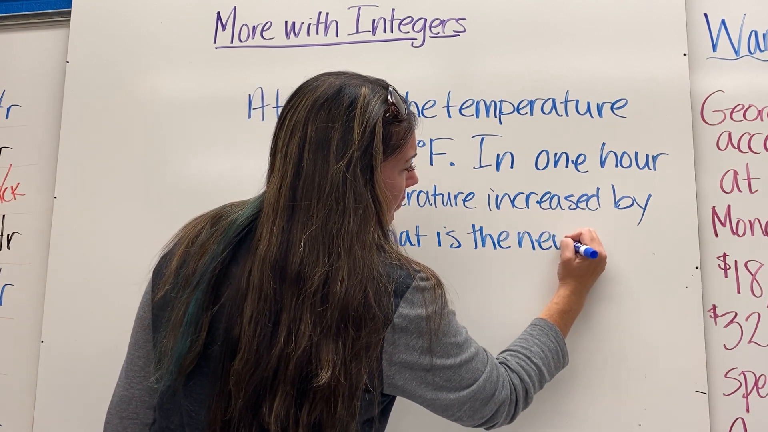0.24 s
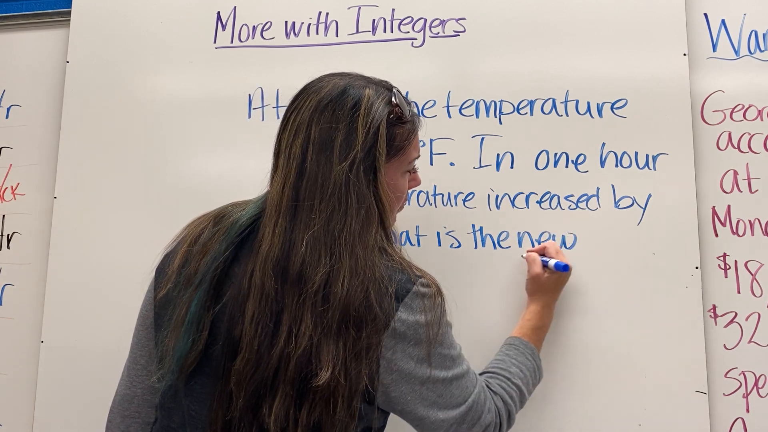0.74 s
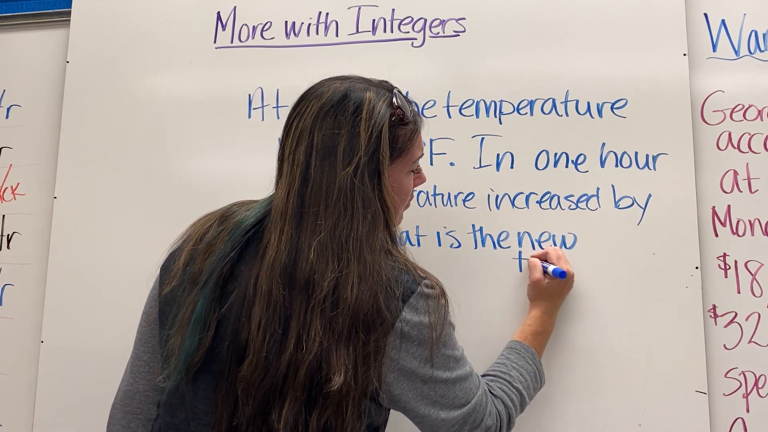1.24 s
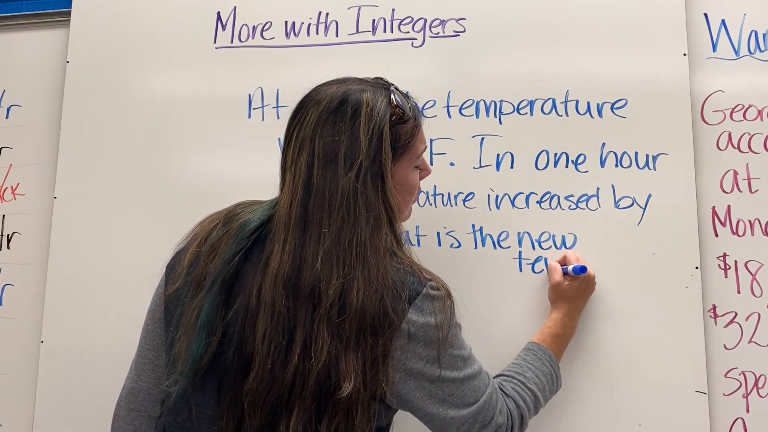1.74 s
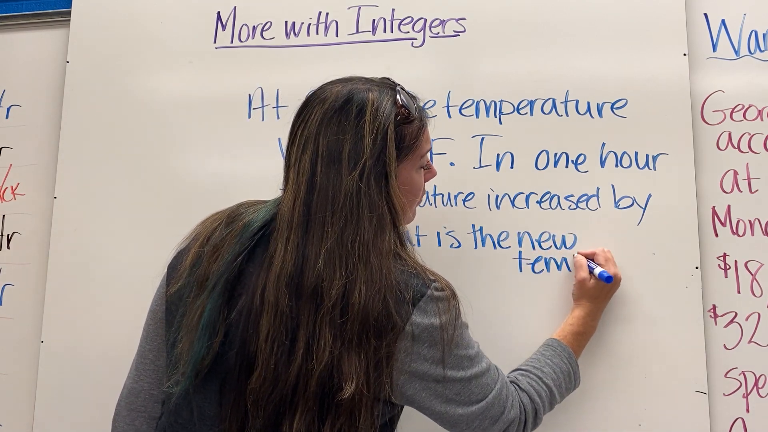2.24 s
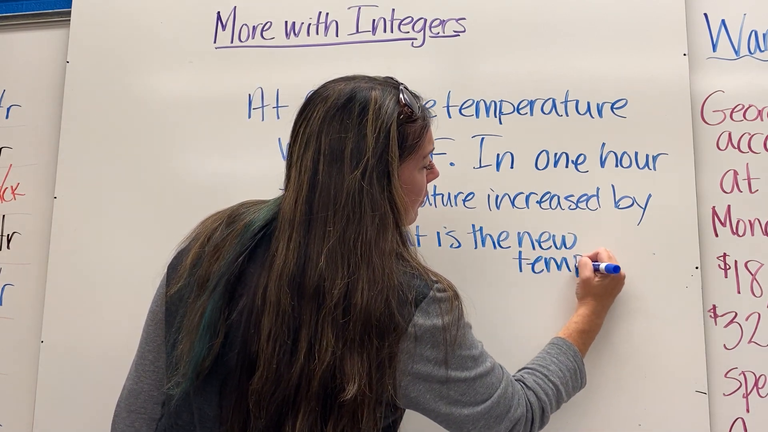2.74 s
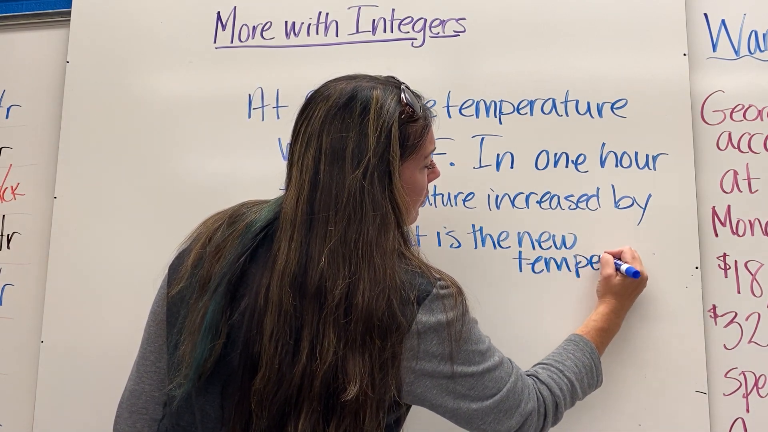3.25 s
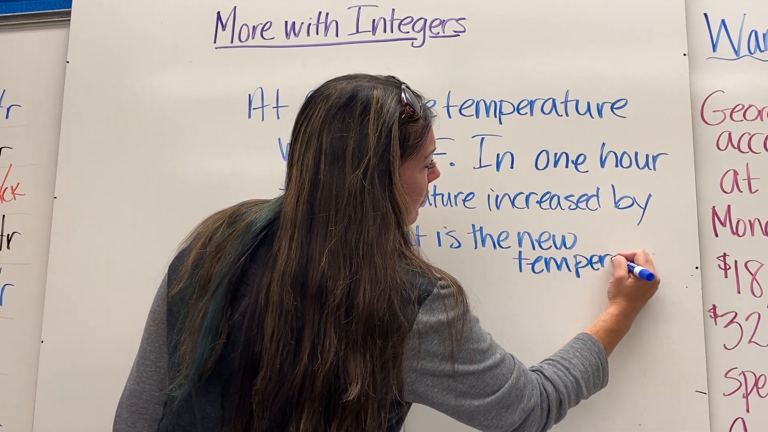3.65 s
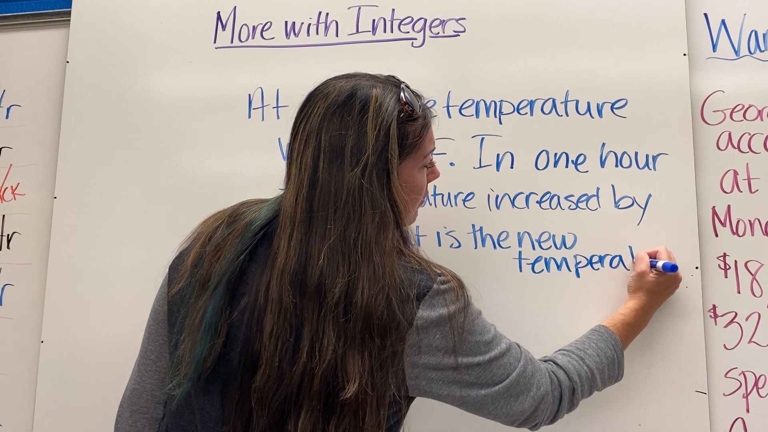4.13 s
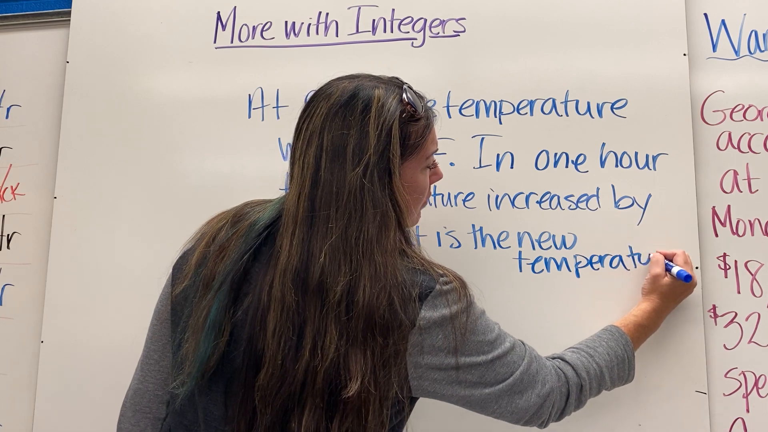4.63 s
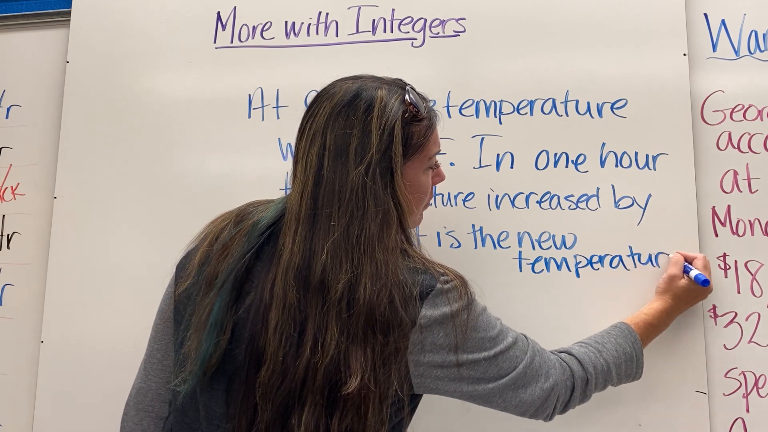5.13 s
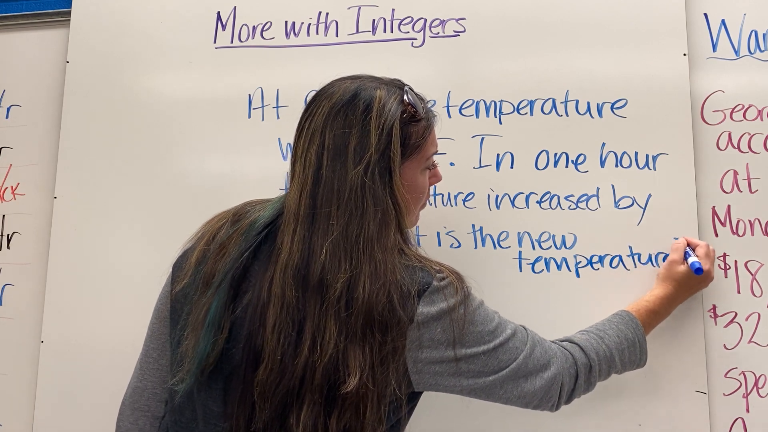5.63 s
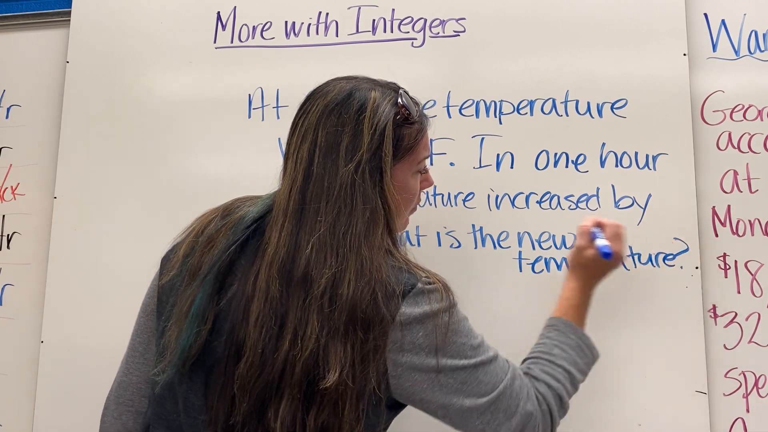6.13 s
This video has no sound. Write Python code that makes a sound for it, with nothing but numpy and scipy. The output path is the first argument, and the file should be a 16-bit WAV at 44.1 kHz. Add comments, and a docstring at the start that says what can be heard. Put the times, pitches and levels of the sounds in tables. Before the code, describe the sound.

Quick, light dry-erase marker strokes scratch and tap on a hollow board in a quiet room with rumbling ventilation and a faint ticking clock.

```python
"""A felt marker writes on a wall-mounted whiteboard in a quiet classroom.
Each stroke is filtered noise: felt hiss, a squeak, a sizzle and the ringing barrel.
Some landings of the nib make the board thud: short pushes set decaying sine waves ringing.
Behind it, ventilation hums and rumbles, noise and clicks swell into a soft rustle,
and something, likely a wall clock, ticks faintly once a second with tiny bursts of noise."""
import sys
import numpy as np
from scipy import signal
from scipy.fft import rfft, irfft
from scipy.io import wavfile

SR = 44100
rng = np.random.default_rng(int(sys.argv[2]) if len(sys.argv) > 2 else 0)


def master_out(mix):
    """Clip the mix to full scale and print it as 16-bit PCM to the path in sys.argv[1]."""
    frames = np.transpose(np.atleast_2d(mix))
    ceiling = np.clip(frames, -1, 1)
    pcm = np.round(ceiling * 32767).astype(np.int16)
    wavfile.write(sys.argv[1], SR, pcm)


N = 281358
TIME = np.arange(N) / SR  # s
BINS_HZ = np.maximum(np.arange(N // 2 + 1) * SR / N, 1)
CLASSROOM_T60_S = 0.3  # time for the room's tail to die by 60 dB


def from_db(db):
    """Turn decibels into gain."""
    return 10 ** (np.asarray(db) / 20)


def rms_one(x):
    """Scale to an rms of 1."""
    return x / np.sqrt(np.mean(x ** 2) + 1e-20)


def filtered(x, hz, kind, order=2):
    """Low-, high- or band-pass that never looks ahead in time."""
    edges = np.clip(hz, 10, .45 * SR)
    sections = signal.butter(order, edges, kind, fs=SR, output="sos")
    return signal.sosfilt(sections, x + 1e-18)


def over_hz(table):
    """Read the columns of a table at every frequency, joined on a log axis."""
    hz, *columns = np.transpose(table)
    return [np.interp(np.log(BINS_HZ), np.log(hz), column) for column in columns]


def coloured(x, spectrum):
    """Make some frequencies of a signal louder and others softer."""
    gain = from_db(over_hz(spectrum)[0])
    return irfft(rfft(x) * gain, N)


def white():
    """Fresh white noise, equally strong at all frequencies."""
    return rng.standard_normal(N)


def narrow_noise(hz, width_hz):
    """Noise in one steep-sided resonance, rms 1; centred on zero it is a slow drift."""
    gain = 1 / (1 + ((BINS_HZ - hz) / width_hz) ** 2)
    return rms_one(irfft(rfft(white()) * gain, N))


def classroom(x, alike_hz=500):
    """A diffuse, dying room tail of unit energy per side; long waves reach both sides alike."""
    t = TIME[:SR]
    shared = filtered(rng.standard_normal(SR), alike_hz, "low", order=4)
    separate = filtered(rng.standard_normal((2, SR)), alike_hz, "high", order=4)
    decay = from_db(-60 * t / CLASSROOM_T60_S)
    tails = (shared + separate) * decay * (t > .005)  # the tail starts after 5 ms
    return signal.fftconvolve(x[None], tails / np.linalg.norm(tails[0]), axes=1)[:, :N]


def friction(grain_db=1.0, pressure_db=1.5):
    """Noise of wavering level, rms 1, like fibres that catch and slip under unsteady pressure."""
    grain = grain_db * narrow_noise(0, width_hz=500)
    pressure = pressure_db * narrow_noise(0, width_hz=21)
    return rms_one(white() * from_db(grain + pressure))


def snags(per_s=130, size_db=0.5):
    """Sparse clicks of uneven size, rms 1, like fibres that stick and snap free."""
    sizes = from_db(size_db * np.minimum(rng.exponential(1, N), 3))
    sizes = sizes * rng.choice([-1, 1], N)
    return rms_one(sizes * (rng.random(N) < per_s / SR))


def shifting(x, patchy_db=3.5, rate_hz=11):
    """As the nib rolls and flexes, each part of the treble swells and sinks on its own."""
    edges = np.linspace(3500, 12500, 10)
    moving = 0
    for k, (low, high) in enumerate(zip(edges, edges[1:])):
        band = (-1) ** k * filtered(x, [low, high], "band")
        moving = moving + band * from_db(patchy_db * narrow_noise(0, rate_hz) - 0.5)
    below = filtered(x, edges[0], "low", order=6)
    above = filtered(x, edges[-1], "high", order=6)
    return rms_one(moving + below + above)


def resonance(x, hz, width_hz):
    """One broad resonance, rms 1."""
    return rms_one(filtered(x, [hz - width_hz / 2, hz + width_hz / 2], "band"))


def gliding(x, hz, travel_hz, width_hz):
    """A resonance driven by x whose centre travels evenly through hz, rms 1."""
    centre_hz = hz + travel_hz * np.linspace(-.5, .5, len(x))
    turn = np.exp(2j * np.pi * np.cumsum(centre_hz) / SR)
    # shift the centre down to zero, keep what lies near it, shift it back up
    return rms_one((filtered(x / turn, width_hz / 2, "low") * turn).real)


# The marker strokes. Each row: start in seconds, length in seconds, fastest moment as a share
# of the stroke (0-1), relative level in dB, sizzle in dB, sizzle in Hz, squeak in dB,
# squeak in Hz, squeak glide in Hz, barrel in dB (these dB count from the stroke's level).
STROKES = [ (-0.04, 0.11, .5, -70, -6, 10900, -10, 6800, 0, -16),
           (0.035, 0.083, .6, -87, -10, 11300, -2, 7400, 198, -8),
           (0.175, 0.089, .55, -76, -11, 11100, -11, 6240, 302, -9),
           (0.262, 0.11, 0.2, -77.5, -11, 11100, -5, 7140, 300, -11),
           (0.385, 0.074, 0.3, -77.5, -9, 11200, -11, 6300, 0, -8),
           (0.452, 0.12, 0.37, -72.5, -5, 10300, -6, 6050, -300, -13),
           (0.937, 0.1, 0.6, -78, -5.5, 11000, -2, 7630, -9, -14),
           (1.172, 0.064, 0.56, -77.5, -24, 11200, -16.5, 7600, 1, -10.5),
           (1.365, 0.12, 0.5, -76, -24, 10500, -3.5, 6600, 897, -18),
           (1.486, 0.16, 0.52, -73.5, -6, 11000, -7, 6600, 1500, -11),
           (1.74, 0.084, .5, -75.5, -6, 10900, -13, 6630, 2, -7),
           (1.828, 0.13, 0.38, -74.5, -5.5, 10900, -11, 6900, -900, -11),
           (1.94, 0.083, 0.75, -76, -7, 11000, -5, 6600, 300, -9),
           (2.048, 0.087, 0.2, -72, -3, 10800, -13, 6500, -3, -11),
           (2.125, 0.087, .55, -76.5, -4, 11000, -4, 6850, 498, -10),
           (2.343, 0.11, 0.48, -74, -2, 10950, -7, 6740, 900, -9),
           (2.464, 0.053, 0.6, -91, 3, 11200, -15, 7000, 0, -19),
           (2.61, 0.098, .5, -79.5, -9, 10800, -4, 6350, 0, -10),
           (2.695, 0.087, .5, -79, -24, 10700, 1, 7200, 300, -14),
           (2.778, 0.08, .55, -82.5, -4, 11000, -2, 5400, -300, -8),
           (2.936, 0.125, .55, -79.5, -17, 10400, -2.5, 6260, -300, -12),
           (3.06, 0.14, 0.5, -76.5, -3.5, 10700, -5, 6000, 300, -13),
           (3.312, 0.08, 0.4, -80, -4, 10900, -8, 5370, -4, -4),
           (3.423, 0.098, .58, -76, -0.5, 10650, -6, 5640, 600, -7),
           (3.66, 0.13, 0.5, -75.5, -2.5, 10700, -0.5, 5700, -1300, -8),
           (3.777, 0.086, 0.46, -76, -11, 10700, -4, 6000, 4, -13),
           (3.901, 0.091, .42, -77, -2.5, 11000, -14, 6130, -4, -13),
           (4.142, 0.094, 0.33, -77.5, 0.5, 10500, -6, 5750, 3, -21),
           (4.375, 0.078, 0.23, -76, -1.5, 10800, -5, 5800, 0, -11),
           (4.48, 0.098, 0.4, -79.5, -3, 10500, -12, 6200, 603, -8),
           (4.568, 0.1, 0.38, -77, -3.5, 11200, -6, 5830, 0, -15),
           (4.68, 0.085, 0.44, -82, -2.5, 10900, -10, 6500, -3, -20),
           (4.895, 0.08, 0.44, -81.5, -1, 10900, -15, 6200, -6, -10),
           (5.037, 0.11, 0.6, -74.5, -3.5, 10900, -7, 6050, -1, -13),
           (5.27, 0.099, 0.27, -75.5, -5, 10700, -16, 6350, 0, -16),
           (5.365, 0.12, 0.55, -74, -1, 11000, -15, 6240, 2, -20),
           (5.455, 0.075, 0.55, -77.5, -2, 10000, -10, 6530, 0, -17),
           (5.668, 0.12, 0.27, -75.5, -5, 10900, -10, 6580, -3, -23),
           (5.777, 0.09, .55, -78, -3, 10600, -21, 6500, -2, -20)]
# The colour of the felt's hiss. Each row: frequency in Hz, relative level in dB per Hz.
FELT_SPECTRUM = [(800, -18.5), (2000, -11.5), (3200, -2.5), (4500, -3), (5000, -6.5), (5500, 0.5),
                 (6300, -1), (7500, -2), (8800, 5), (9700, -2.5), (10600, -12), (12200, -10), (13200, -20),
                 (14000, -8), (15000, -1), (16500, -10)]
BARREL_HZ, BARREL_WIDTH_HZ = 4990, 300  # the marker's own body rings along
SIZZLE_GLIDE_HZ = 450  # typical travel of the sizzle as the nib turns through a stroke


def marker(squeak_width_hz=480, sizzle_width_hz=1050, hiss_swell=0.66, ring_swell=1.2,
           waver_db=-0.3, count=4):
    """Felt hisses as it moves and rings where fastest; the room answers a few places differently."""
    hiss = rms_one(coloured(shifting(friction() + from_db(-6) * snags()), FELT_SPECTRUM))
    slips = friction() + from_db(-7.5) * snags()
    slips = slips * from_db(waver_db * narrow_noise(0, width_hz=32))
    whisper = resonance(friction(), 15100, 1400)
    barrel = resonance(friction(), BARREL_HZ, BARREL_WIDTH_HZ)
    turns = rng.standard_normal(len(STROKES))
    places = np.zeros((count, N))
    for k, stroke in enumerate(STROKES):
        start, length, fastest, db, sizzle_db, sizzle_hz = stroke[:6]
        squeak_db, squeak_hz, glide_hz, barrel_db = stroke[6:]
        span = (TIME > start) & (TIME < start + length)
        # the speed rises from zero to its peak and falls back
        progress = (TIME[span] - start) / length
        peak = np.clip(fastest, .1, .9)
        speed = np.sin(np.pi * np.interp(progress, [0, peak, 1], [0, .5, 1]))
        # the nib rings in two resonances whose pitches follow its angle to the board
        squeak = gliding(slips[span], squeak_hz, glide_hz, squeak_width_hz)
        sizzle = gliding(slips[span], sizzle_hz, SIZZLE_GLIDE_HZ * turns[k], sizzle_width_hz)
        ringing = from_db(sizzle_db) * sizzle + from_db(squeak_db) * squeak
        rub = rms_one(hiss[span]) + from_db(barrel_db) * rms_one(barrel[span])
        sound = speed ** hiss_swell * rub + speed ** ring_swell * ringing
        places[k % count, span] += from_db(db) * sound
        # the thinnest hiss is there however lightly the nib slides
        places[k % count, span] += from_db(-89.5) * np.sqrt(speed) * whisper[span]
    room = sum(classroom(from_db(-5.0) * filtered(place, 5500, "low")) for place in places)
    direct = places.sum(axis=0)
    return from_db(-2.5) * direct + room + from_db(-14.5) * classroom(direct)


def diffuse(spectrum, apart_db):
    """Stereo noise of rms 1: a part common to both sides and a part of each side's own."""
    separate = from_db(apart_db) * np.array([white(), white()])
    return rms_one(coloured(white() + separate, spectrum))


def hum(hz, level_rows, wander_hz, wander_rate_hz, flutter_db, flutter_rate_hz):
    """A tone that swells and sinks slowly, and wavers at random in pitch and level."""
    pitch = hz + wander_hz * narrow_noise(0, wander_rate_hz)
    tone = rms_one(np.sin(2 * np.pi * np.cumsum(pitch) / SR))
    flutter = rms_one(from_db(flutter_db * narrow_noise(flutter_rate_hz, flutter_rate_hz / 2)))
    level = from_db(np.interp(TIME, *np.transpose(level_rows)))
    return filtered(level * flutter * tone, 440, "low")


# The colour of the duct's rumble. Each row: frequency in Hz, relative level in dB per Hz.
RUMBLE_SPECTRUM = [(15, -47), (25, -21.5), (34, -1), (48, 5.5), (72, 1.5), (90, -1), (118, 11), (136, 8),
                   (155, -5), (178, -1.5), (215, -5), (290, -9.5), (400, -20), (550, -41), (900, -61),
                   (3000, -110)]
# The colour of the rushing air. Each row: frequency in Hz, relative level in dB per Hz.
AIR_SPECTRUM = [(100, -4), (350, 10.5), (600, 5), (800, 1), (1200, -0.5), (1600, -3), (1780, -9.5),
                (2500, -10.5), (3000, -16.5), (4000, -21.5), (5000, -25.5), (6500, -23), (9000, -33),
                (12000, -32), (13200, -45.5)]
# How the low hum swells and sinks. Each row: time in seconds, relative level in dB.
HUM_LEVEL = [(0.0, -54), (0.25, -45), (0.58, -37), (0.97, -45), (1.152, -35), (1.32, -51), (1.52, -37),
             (1.799, -42), (1.95, -40), (2.12, -46), (2.28, -38.5), (2.5, -38.5), (2.68, -57.5),
             (2.848, -39), (3.102, -47.5), (3.329, -42), (3.83, -54), (3.969, -37), (4.18, -37),
             (4.55, -43.5), (4.85, -41.5), (5.101, -39), (5.42, -50.5), (5.68, -42.5), (6.1, -39.5),
             (6.37, -54.5)]
# How the fan tone swells and sinks. Each row: time in seconds, relative level in dB.
FAN_LEVEL = [(0.0, -58), (0.202, -46), (0.75, -60.5), (1.0, -46.5), (1.5, -51), (1.7, -48), (1.92, -47),
             (2.45, -48), (3.17, -57.5), (3.552, -47), (4.1, -47), (4.23, -51), (4.369, -47), (4.58, -58.5),
             (4.85, -48), (5.55, -48), (5.76, -55), (6.032, -40.5), (6.37, -56.5)]
# Blurred tones of fans and ducts. Each row: centre in Hz, width to each side in Hz, level in dB.
FAN_TONES = [(360.6, 18, -70), (490.7, 11, -80), (516, 18, -75.5), (662, 4.4, -87), (840.3, 3.9, -79.5)]
HUM_HZ, FAN_HZ = 102.03, 200


def ventilation():
    """Duct rumble and rushing air are shaped noise; the hum and fan add wavering tones."""
    rumble = from_db(-43.5) * diffuse(RUMBLE_SPECTRUM, apart_db=-15.5)
    air_db = -64.5 + 0.88 * narrow_noise(0, width_hz=7.6)
    air = from_db(air_db) * diffuse(AIR_SPECTRUM, apart_db=4.0)
    duct = from_db(-2.5) * hum(HUM_HZ, HUM_LEVEL, wander_hz=3.446, wander_rate_hz=10.15,
                               flutter_db=3.0, flutter_rate_hz=12.6)
    fan = from_db(-3.5) * hum(FAN_HZ, FAN_LEVEL, wander_hz=1.6, wander_rate_hz=7.2,
                              flutter_db=3.5, flutter_rate_hz=4.85)
    tones = sum(from_db(db) * narrow_noise(hz, width) for hz, width, db in FAN_TONES)
    return rumble + air + duct + fan + tones


# Soft rustling swells, many once a second near the clock's ticks, perhaps its mechanism
# whirring; others perhaps cloth. Each row: peak in seconds, rise in seconds,
# fall in seconds, level in dB.
RUSTLE_SWELLS = [(0.2, .15, 0.15, -89), (0.805, 0.12, 0.23, -77), (1.25, 0.11, 0.14, -95),
                 (1.79, 0.073, 0.13, -80), (2.55, .15, .15, -93), (2.82, 0.14, .3, -78),
                 (3.75, .25, .15, -73.5), (3.97, .1, 0.18, -87), (4.52, 0.18, 0.11, -79),
                 (4.82, .06, 0.26, -82), (5.4, .15, .15, -91), (5.775, 0.15, 0.11, -72.5),
                 (6.17, .2, .3, -89.5)]
# The colour of the rustle. Each row: frequency in Hz, relative level in dB per Hz.
RUSTLE_SPECTRUM = [(500, -17.5), (1250, 13), (2000, 4.5), (2600, 1.5), (3500, 4.5), (4600, -3), (6000, -16),
                   (12000, -27)]
RUSTLE_REST_DB = -96.5  # the steady rustle under the swells


def rustle():
    """Wavering noise with sparse clicks makes a soft, slightly scratchy rustle that swells and fades."""
    scratches = np.array([friction() + from_db(-3.5) * snags(per_s=240) for side in range(2)])
    texture = rms_one(coloured(scratches, RUSTLE_SPECTRUM))
    level = from_db(RUSTLE_REST_DB)
    for peak, rise, fall, db in RUSTLE_SWELLS:
        level = level + from_db(db) * np.interp(TIME, [peak - rise, peak, peak + fall], [0, 1, 0])
    return level * texture


def ring(x, hz, t60):
    """A mode, one way of vibrating: a unit click starts a dying sine of height 1."""
    r = from_db(-60 / (t60 * SR))  # what is left after one sample
    w = 2 * np.pi * hz / SR
    return signal.lfilter([0, np.sin(w)], [1, -2 * r * np.cos(w), r * r], x + 1e-18)


# The nib lands on the board. Each row: time in seconds, relative knock level in dB, knock in Hz,
# delay until it seats in seconds, relative thud level in dB, thud in Hz,
# contact hardness as the upper edge of the push in Hz, relative ring of the whole panel in dB.
LANDINGS = [(0.177, -43.5, 346, 0.0088, -50, 245, 400, 3.5), (0.913, -55, 400, 0.017, -45.5, 248, 352, 3.5),
            (1.1448, -43.5, 445, 0.012, -35.5, 255, 475, 1),
            (1.343, -47.5, 473, .012, -36.5, 250, 600, -5.5), (1.707, -66, 380, .0105, -48.5, 240, 300, 1),
            (2.326, -57, 420, .013, -41.5, 255, 400, -4), (3.301, -47, 423, 0.0091, -42.5, 270, 650, 0),
            (3.613, -45.5, 625, .008, -43, 256, 800, 0.5),
            (4.1299, -43.5, 620, 0.0088, -38.5, 327, 1100, 1), (4.884, -53, 377, 0.011, -46, 273, 400, 3),
            (5.2368, -47.5, 567, .0105, -43, 280, 694, 1), (5.6648, -48.5, 510, .0105, -37, 336, 520, 1),
            (5.9691, -48.5, 514, .0108, -42.5, 310, 600, 10)]
# Modes of the board. Each row: frequency in Hz, relative level in dB,
# time to die by 60 dB in seconds.
BOARD_MODES = [(92, -18.5, 0.23), (136.5, -7.5, 0.19), (199, -1, 0.13), (252.6, -7, 0.14),
               (297.4, -14, 0.18), (322.3, -9.5, 0.15), (362, -15, 0.16), (486.4, -4, 0.062),
               (609, -13, 0.11), (1320, -4.5, 0.021), (1463, -15, 0.24), (2230, -7.5, 0.023)]
KNOCK_T60_S, THUD_T60_S = .015, .045  # the panel gives way right under the nib
# the nib judders as it settles: level against the thud, decay time, upper edge
SKID_DB, SKID_S, SKID_HZ = -36.5, 0.023, 490
ECHO_S, ECHO_DB = 0.036, -5  # the far wall throws the thud back
THUD_ROOM_DB = -15


def board(tick_db=13):
    """A dry knock as the nib touches and a deeper thud as it seats both stir the panel's modes."""
    pushes, dents, settling = np.zeros((3, N))
    click = signal.unit_impulse(SR // 5)
    for s, knock_db, knock_hz, seat_s, thud_db, thud_hz, hardness_hz, panel_db in LANDINGS:
        knock = (s, knock_db, knock_hz, KNOCK_T60_S, hardness_hz)
        seating = (s + seat_s, thud_db, thud_hz, THUD_T60_S, 1.34 * thud_hz)
        for when, db, hz, t60, edge_hz in (knock, seating):
            at = round(when * SR)
            push = from_db(db) * filtered(click, edge_hz, "low")
            pushes[at:at + len(click)] += from_db(panel_db) * push
            dents[at:at + len(click)] += filtered(ring(push, hz, t60), hz / 2, "high")
        settling += from_db(thud_db + SKID_DB) * (TIME > s) * np.exp(-abs(TIME - s) / SKID_S)
    judder = filtered(settling * white(), [SKID_HZ / 2, SKID_HZ], "band", order=3)
    pushes = pushes + judder
    panel = 0
    for k, (hz, db, t60) in enumerate(BOARD_MODES):
        panel = panel + (-1) ** k * from_db(db) * ring(pushes, hz, t60)
    # the first instant of contact is a thin tick
    tick = from_db(tick_db) * filtered(pushes, 2500, "high")
    thud = from_db(5.5) * dents + from_db(-0.5) * panel + tick
    echo = from_db(ECHO_DB) * np.interp(TIME - ECHO_S, TIME, filtered(thud, 320, "low"))
    return thud + echo + from_db(THUD_ROOM_DB) * classroom(thud)


# The clock steps once a second. Each row: time in seconds, relative strength in dB.
CLOCK_STEPS = [(0.713, -7.5), (1.711, -6), (2.714, -7.5), (3.714, -8.5), (4.714, -10), (5.712, -19)]
# Contacts within a step, tick and tock in turn. Each row: delay in seconds,
# relative level in a tick in dB, relative level in a tock in dB, brightness (upper edge) in Hz.
ESCAPEMENT = [(0.0, -81, -69, 4480), (0.056, -65, -63.5, 2550), (0.086, -63, -68.5, 4500)]
# The colour the case gives. Each row: frequency in Hz, relative level in dB per Hz.
CLOCK_CASE = [(200, -51.5), (700, -24), (1200, 5), (1700, 6), (2200, 0.5), (3200, -1.5), (4200, -4),
              (4800, -8), (5700, -2.5), (7000, -11), (12000, -22)]


def clock(click_s=0.0029):
    """Three tiny clicks each second, coloured by the case and heard mostly by way of the room."""
    clicks = np.zeros(N)
    t = TIME[:SR // 10]
    for step, (s, strength_db) in enumerate(CLOCK_STEPS):
        for delay, tick_db, tock_db, bright_hz in ESCAPEMENT:
            at = round((s + delay) * SR)
            burst = rng.standard_normal(len(t)) * np.exp(-t / click_s)
            click = filtered(burst, bright_hz, "low", order=1)
            contact_db = tock_db if step % 2 else tick_db
            clicks[at:at + len(t)] += from_db(strength_db + contact_db) * click
    ticks = coloured(clicks, CLOCK_CASE)
    return from_db(14.0) * ticks + from_db(21.0) * classroom(ticks)


# Thin, very high squeaks as the hand swings away. Each row: start in seconds,
# length in seconds, level in dB, first pitch in Hz, last pitch in Hz.
THIN_SQUEAKS = [(6.19, .09, -90, 14100, 15800), (6.3, 0.15, -87, 14700, 14600)]


def thin_squeaks(width_hz=750):
    """Friction drives faint gliding resonances at the very top of the treble."""
    out, slips = np.zeros(N), friction()
    for start, length, db, from_hz, to_hz in THIN_SQUEAKS:
        span = (TIME > start) & (TIME < start + length)
        swell = np.sin(np.pi * (TIME[span] - start) / length)
        squeak = gliding(slips[span], (from_hz + to_hz) / 2, to_hz - from_hz, width_hz)
        out[span] += from_db(db) * swell * squeak
    return out


def scene():
    """Writing in front, the room behind."""
    return marker() + ventilation() + rustle() + board() + clock() + thin_squeaks()


# The two microphone ports. Each row: frequency in Hz, left-right level difference in dB,
# phase lead of the left in radians.
PORTS = [(30, .7, .35), (100, 1.3, .62), (220, -1.1, .5), (400, .5, .65), (600, 3.5, .5), (900, 1, -2.3),
         (1250, 10, -4.2), (1700, -1, -5.3), (2400, 1.5, -8.2), (3200, -2, -7.2), (5200, -4, -6.9),
         (7000, -1.5, -6.9), (8500, .5, -3.2), (11000, 0, 0), (11900, 0, .3), (13200, 0, 3.1),
         (15500, 0, 6.2)]
CUTOFF_HZ = 15800


def record(dry):
    """The two ports differ in level and phase; the top is cut steeply."""
    balance_db, lead = over_hz(PORTS)
    half = np.array([[.5], [-.5]])  # left and right share each difference
    eased = dry * signal.windows.tukey(N, .004)  # short fades at both ends
    port_response = from_db(half * balance_db) * np.exp(1j * half * lead)
    heard = irfft(rfft(eased) * port_response, N)
    return signal.sosfilt(signal.ellip(10, .1, 80, CUTOFF_HZ, fs=SR, output="sos"), heard)


dry = scene()
out = record(dry)
master_out(out)
```